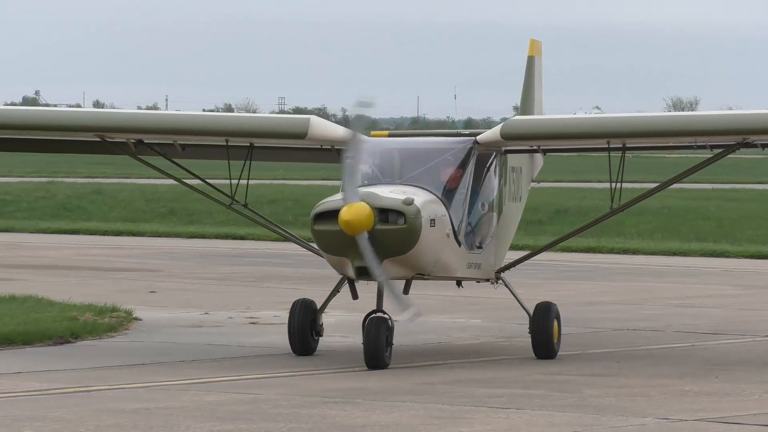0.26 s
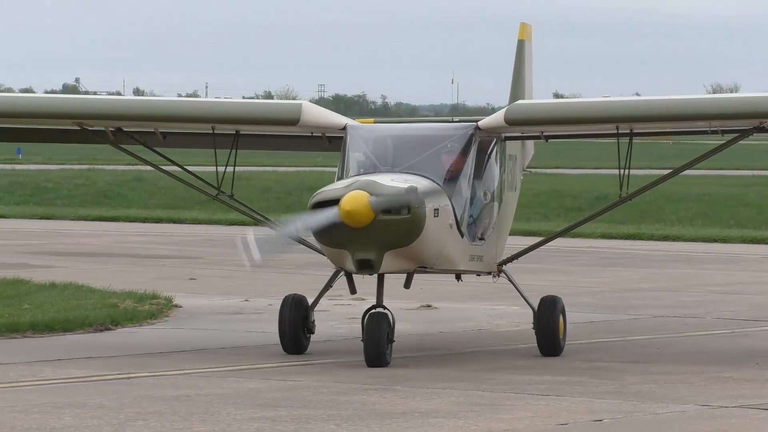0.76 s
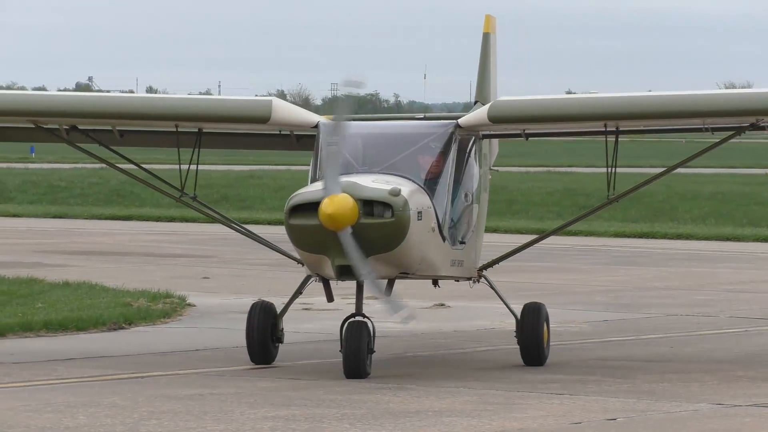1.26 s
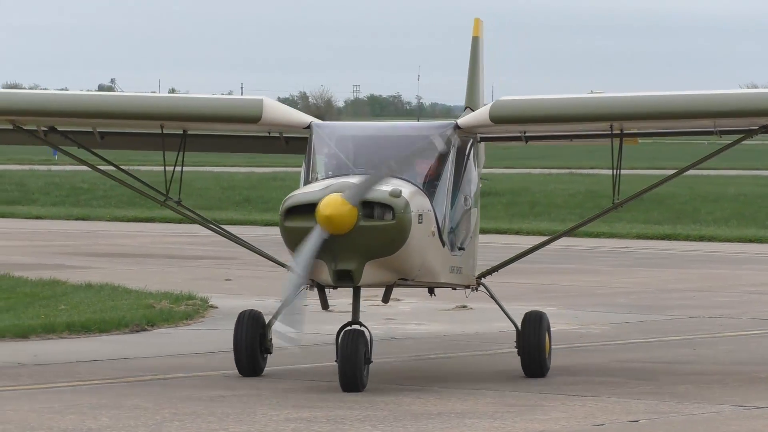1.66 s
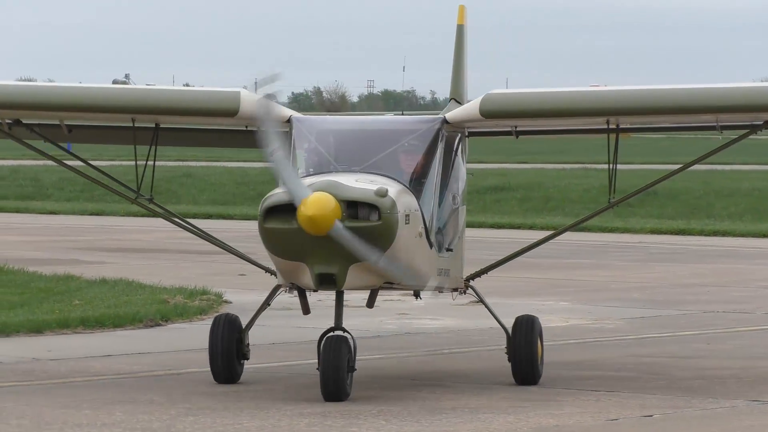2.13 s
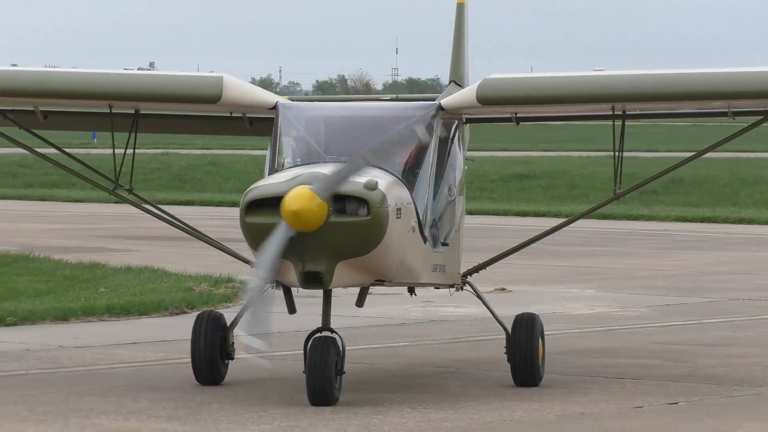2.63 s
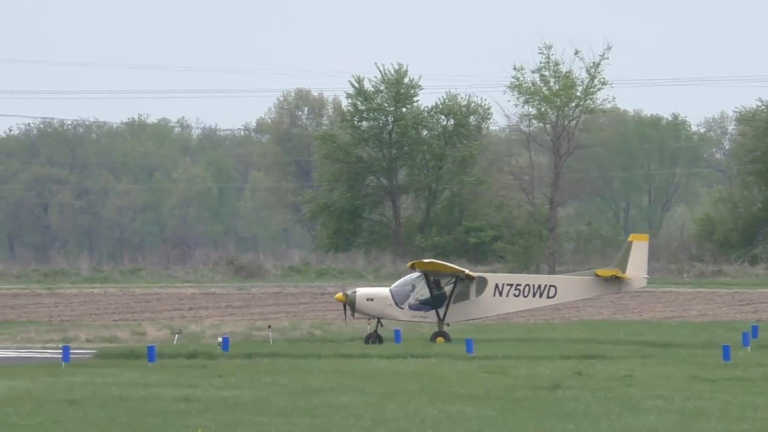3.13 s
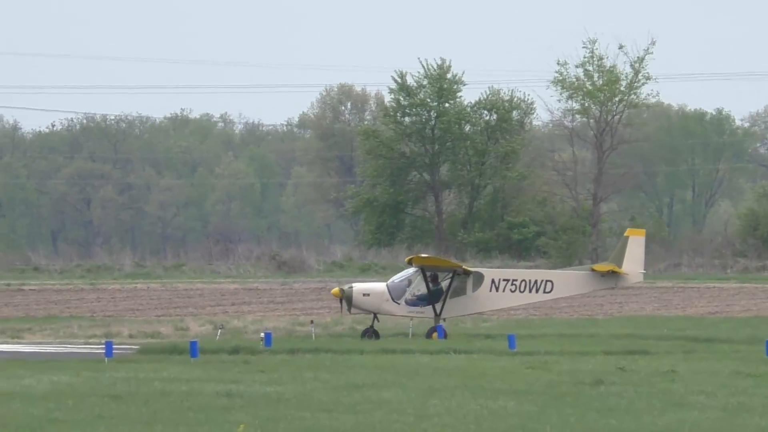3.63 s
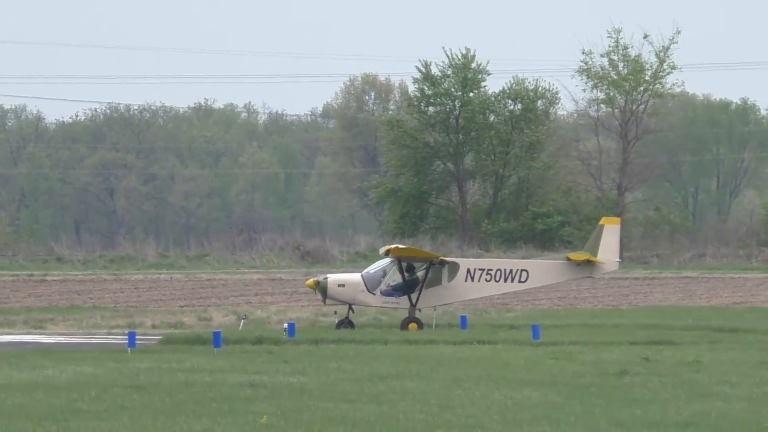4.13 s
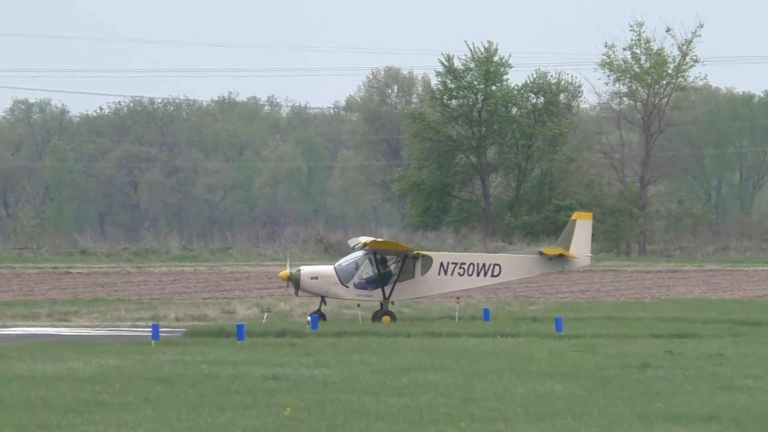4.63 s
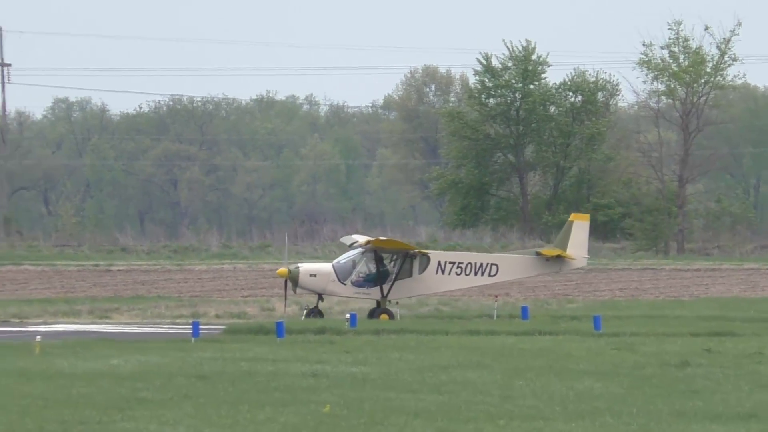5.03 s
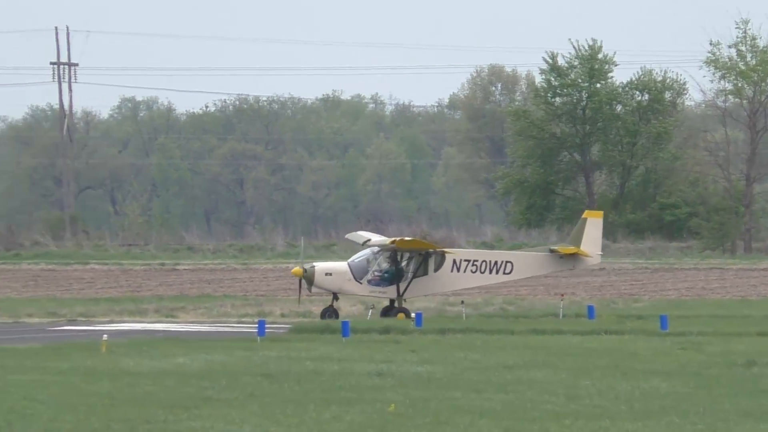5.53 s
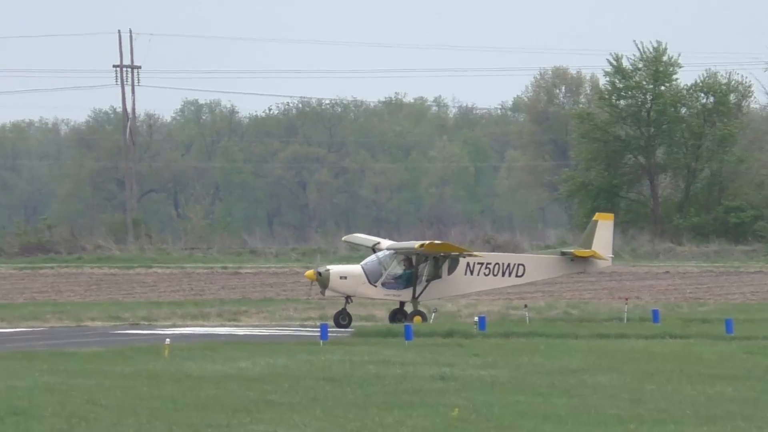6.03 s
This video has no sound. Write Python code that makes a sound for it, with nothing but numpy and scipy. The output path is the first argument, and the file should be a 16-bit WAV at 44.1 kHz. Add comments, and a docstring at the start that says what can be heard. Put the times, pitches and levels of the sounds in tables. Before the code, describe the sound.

Close, loping idle of a small taxiing propeller plane, switching abruptly to its faint faraway drone under whistling birdsong.

```python
"""A light aircraft, near and far

A four-cylinder engine idles as the aircraft taxis close by: gas pulses ring unequal pipes in a loping
beat, valves tick on steel, and the propeller chops the air in step with the firings. The scene then
jumps to the same aircraft far across the airfield, a faint mutter in the open air, while a lark
whistles in the grass and other birds answer from farther off."""
import sys
import numpy as np
from scipy import signal
from scipy.fft import rfft, irfft, next_fast_len
from scipy.io import wavfile
from scipy.ndimage import map_coordinates

SR = 44100
rng = np.random.default_rng(int(sys.argv[2]) if len(sys.argv) > 2 else 0)


def unload_wav(signal):
    """Save mono or channel-first audio to the path in sys.argv[1] as 16-bit WAV at rate SR, clipped to [-1, 1]."""
    wavfile.write(
        sys.argv[1],
        SR,
        np.round(np.clip(np.atleast_2d(signal).T, -1, 1) * 32767).astype(np.int16),
    )


N = 276948
TIME = np.arange(N) / SR
JUMP_S, TOP_HZ = 2.833, 15750  # the jump from near to far; the band limit

# Likeness of left and right, far and near. Each row: frequency in Hz, correlation.
FAR_COHERENCE = [(60, 0.77), (150, 0.82), (380, 0.76), (950, 0.76), (2380, 0.12), (5980, 0.17),
                 (15000, 0.34)]
NEAR_COHERENCE = [(60, .97), (240, 1), (480, 0.58), (950, 0.16), (1900, 0.59), (3800, 0.5), (7500, 1),
                  (15000, 0.74)]
# Spectra of the noise sources. Each row: frequency in Hz, relative spectral density in dB.
HISS_SPECTRUM = [(200, 13.5), (3000, 4), (6000, -10), (8000, -6.5), (11000, -1.5), (15500, -1.5)]
RUMBLE_SPECTRUM = [(12, -48), (20, -37), (32, -15), (54, -3), (109, -0.5), (166, -5.5), (189, -14.5),
                   (228, -4), (258, -17), (400, -17), (520, -22), (880, -120)]
RUSH_SPECTRUM = [(150, -44), (250, -0.5), (403, -33), (499, -7.5), (555, -9.5), (724, -7), (1120, -3),
                 (1220, -0.5), (1550, -8), (2300, -12), (2970, -20.5), (3670, -24.5), (5050, -43),
                 (6000, -34), (7800, -69), (13200, -120)]
WASH_SPECTRUM = [(20, -35), (50, -11), (100, -1.5), (170, -9.5), (250, -11), (500, -19.5), (900, -17),
                 (2000, -54)]
TICK_SPECTRUM = [(1500, -37), (3000, -24), (4200, 0), (5300, 1), (6700, -1.5), (8400, 7), (10500, -4.5),
                 (13000, -5), (15500, -19)]
RASP_SPECTRUM = [(290, -32), (500, -17), (594, -8), (716, 7), (888, -4.5), (1060, 4), (1250, -11.5),
                 (1430, 0.5), (1650, -18), (1770, -6), (2540, -8), (4190, -16.5), (6180, -23), (9930, -23),
                 (15500, -36.5)]
# Distant hollow tones. Each row: middle and half length in seconds, pitch in Hz, level in dB.
SWELLS = [(4.468, 0.0088, 462, -46), (4.558, 0.12, 122, -42.5)]
# Machine tones. Each row: peak time in seconds, pitch in Hz, level in dB, fall either side in dB/s.
WHINES = [(3.05, 984, -62, 23), (4.7, 980, -64, 8), (5.6, 1230, -53.5, 26)]
# Hoarse calls. Each row: middle and half length in seconds, band centre and width in Hz, level in dB.
HOARSE_CALLS = [(4.061, .0015, 6800, 3000, -59), (4.54, 0.094, 6350, 1100, -74.5),
                (5.79, .016, 4050, 250, -63), (6.256, .022, 4070, 350, -68)]
# Lark song. Each row: start and length in seconds, first and last pitch in Hz, level in dB,
# swell over the note in dB, trill from 0 to 1, left minus right in dB.
LARK_NOTES = [(3.337, 0.19, 3820, 3645, -51, 18, 0.02, 10.5), (3.552, .14, 4150, 3840, -72, 7, 0.34, -16),
              (3.66, 0.32, 2935, 2860, -45, -5.5, 0.01, 7.5), (4.071, 0.069, 5000, 4760, -51, 9, 0.1, 8),
              (4.176, 0.066, 5480, 5340, -53.5, -2, 0.06, 6), (4.241, 0.039, 4100, 3930, -51, 0, 0.06, 13),
              (4.293, 0.009, 4250, 8200, -57, -2, 0, 3), (4.313, 0.051, 4580, 4160, -49, -5, 0.45, 11),
              (4.369, .058, 3610, 3370, -44, 3.5, 0.03, 8),
              (4.441, 0.064, 3720, 3495, -46.5, 11, 0.1, 11.5), (4.513, 0.11, 3400, 3170, -49, -4, 0.35, 9),
              (5.33, 0.2, 4800, 4710, -74, 3, 0.1, 13), (5.756, .11, 3820, 3540, -63.5, 3, 0.1, 15),
              (6.007, 0.039, 4850, 4550, -66, 4, 0.4, 10), (6.075, .012, 4700, 3400, -60, 0, 0, 1),
              (6.104, 0.18, 4000, 3720, -70, -1, 0.3, 17)]
# Engine speed, far and near. Each row: time in seconds, firings per second.
FAR_SPEED = [(2.8, 29), (4.5, 26.5), (5.2, 24.8), (6.28, 23.8)]
NEAR_SPEED = [(0, 29.36), (1.05, 29.12), (1.42, 29.53), (1.85, 29.0), (2.83, 29.22)]
# The far aircraft. Each row: time in seconds, relative levels of exhaust and propeller rush in dB.
FAR_LEVELS = [(2.9, -52, -59), (3.3, -54.5, -60), (3.85, -52, -64.5), (4.03, -53.5, -61),
              (4.33, -55, -60.3), (4.54, -51.5, -59), (5.6, -51, -58), (6.28, -52.5, -57.7)]
# Cylinders in firing order. Each row: exhaust lead in seconds, thump level in dB, pipe pitch in Hz,
# swell time in seconds, then relative levels in dB of rasp, valve tick, rocker clack and exhaust crack.
CYLINDERS = [(0.0034, -17, 106.4, 0.0061, 3, 11, -26, -25), (0.0039, -16.5, 97, 0.01, 4, 9, -36, -17.5),
             (0.0057, -16.5, 97.5, 0.008, 1.5, 9.5, -30.5, -17.5),
             (0.0043, -15.5, 102.6, 0.0095, 3.5, 6, -45, -33)]
# Hard firings. Each row: time in seconds, relative levels of exhaust crack and rocker clack in dB.
KNOCKS = [(.975, -19, -25), (1.009, -22, -29), (1.622, -15, -21), (2.208, -13, -23.5), (2.587, -22, -23)]
# Steel rocker gear. Each row: mode frequency in Hz, relative level in dB, time to fall 60 dB in seconds.
ROCKER_MODES = [(3816, 14.5, 0.0084), (4300, 7, 0.033), (5130, -2.5, 0.027), (5740, 0.5, 0.036),
                (6710, -1.5, 0.062), (7280, -11, .035), (7700, -2, 0.035), (8100, -19, 0.055),
                (8660, -9, .04), (9530, -4, 0.032), (9820, -1, 0.063), (10800, 1.5, 0.054),
                (11800, -0.5, 0.033)]
# Exhaust pipe overtones. Each row: frequency in Hz, bandwidth in Hz, gain in dB.
PIPE_MODES = [(388.7, 47.4, 6.5), (703, 104, -10), (1062, 48, -8.5), (1550, 236, -11), (1787, 62, -6),
              (2500, 47, -16.5)]
# Filters on the parts of the exhaust sound. Each row: frequency in Hz, gain in dB.
THUMP_MUFFLER = [(25, -24), (45, 6), (60, 0), (115, 2), (150, 5.5), (200, 1), (300, -9), (600, -25)]
BARK_MUFFLER = [(120, -18), (260, 0), (320, 7), (390, -1), (465, 5.5), (510, -13.5), (590, -15),
                (660, 4), (810, 10.5), (880, -5), (1000, 4.5), (3000, -2), (6000, -12)]
RASP_FILTER = [(600, -7), (1500, -2.5), (2500, 2), (4000, 4), (6000, -2.5), (9000, -2)]
CRACK_FILTER = [(350, -26), (700, 7), (1100, 14), (1800, 9.5), (2800, 11.5), (4200, 13),
                (5500, -7), (12000, -8)]
# Exhaust eddies. Each row: frequency in Hz, share of the power that repeats each cycle.
REPEAT_SHARE = [(420, .5), (700, .2), (1500, .08)]
# Stereo balance of the near aircraft. Each row: frequency in Hz, left minus right in dB.
NEAR_PAN = [(200, -.5), (380, -3), (700, -5), (1290, -5.5), (2380, -3.3), (4400, -1), (8000, 0)]


def amp(db):
    """Decibels as an amplitude ratio."""
    return 10 ** (np.asarray(db) / 20)


def unit(x):
    """Normalisation to rms 1."""
    return x / np.sqrt(np.mean(x ** 2) + 1e-20)


def along(points, hz):
    """Interpolation of (Hz, value) points on a log frequency axis."""
    f, values = np.transpose(points)
    return np.interp(np.log(hz + 1), np.log(f + 1), values)


def curves(rows):
    """Linear interpolation in time of each column after the first."""
    times, *columns = np.transpose(rows)
    return [np.interp(TIME, times, column) for column in columns]


def wobble(rate):
    """A smooth random curve with rate knots a second."""
    return map_coordinates(rng.standard_normal(int(N * rate / SR) + 4), [TIME * rate])


def sine(hz):
    """A tone whose phase is the integral of its frequency."""
    return np.sin(2 * np.pi * np.cumsum(hz) / SR)


def filtered(x, response):
    """Linear filtering: the spectrum times a frequency response."""
    size = next_fast_len(N + SR // 2)
    return irfft(rfft(x, size) * response(np.fft.rfftfreq(size, 1 / SR)), size)[..., :N]


def shaped(x, gains):
    """Filtering by a (Hz, dB) curve."""
    return filtered(x, lambda hz: amp(along(gains, hz)))


def coloured(x, spectrum):
    """Spectral shaping, at rms 1."""
    return unit(shaped(x, spectrum))


def noise(coherence):
    """White stereo noise: the ratio of mid to side sets the correlation of the channels."""
    def weights(hz):
        angle = np.arccos(np.clip(along(coherence, hz), -1, 1)) / 2
        return np.array([np.cos(angle), np.sin(angle)])
    mid, side = filtered(rng.standard_normal((2, N)), weights)
    return np.array([mid + side, mid - side])


def add(track, s, sound):
    """Superposition of a sound on a track from s seconds."""
    start = round(s * SR)
    first, last = max(start, 0), min(start + sound.shape[-1], N)
    if last > first:
        track[..., first:last] += sound[..., first - start:last - start]


def firings(speed):
    """The firing rate integrates to a running count; each whole number gives a firing time."""
    count = .483 + np.cumsum(curves(speed)[0]) / SR  # starts between two firings
    return count, np.interp(np.arange(int(count[-1])), count, TIME)


def strokes(times, levels_db, scatter_db):
    """Cycle-to-cycle variation: (seconds, dB) for each firing, scattered about its cylinder's level."""
    db = np.resize(levels_db, len(times)) + scatter_db * rng.standard_normal(len(times))
    return np.column_stack([times, db])


def bursts(times, levels_db, rise_s, fall_s, scatter_db):
    """An envelope of rms 1 that flares at each firing and decays exponentially."""
    t, envelope = np.arange(SR // 10) / SR, np.zeros(N)
    shape = (1 - np.exp(-t / rise_s)) * np.exp(-t / fall_s)
    for s, db in strokes(times, levels_db, scatter_db):
        add(envelope, s, amp(db) * shape)
    return unit(envelope)


def hiss():
    """The noise floor: steady, partly coherent microphone hiss."""
    return amp(-62) * coloured(noise([(100, .27), (10000, .62)]), HISS_SPECTRUM)


def hollow_swells():
    """Low wavering tones swell and fade under Gaussian envelopes."""
    return sum(amp(db) * np.exp(-((TIME - s) / half) ** 2) * sine(hz * (1 + .0283 * wobble(40)))
               for s, half, hz, db in SWELLS)


def machine_whines():
    """Distant machine tones swell and fade, randomly modulated in level and pitch."""
    return sum(amp(db - fall * np.abs(TIME - s) + 3.9 * wobble(11)) * sine(hz + 8 * wobble(45))
               for s, hz, db, fall in WHINES)


def hoarse_calls():
    """Birds tick and rasp without a clear pitch: pulses of band-limited noise."""
    calls = np.zeros(N)
    for s, half, hz, width, db in HOARSE_CALLS:
        band = filtered(rng.standard_normal(N), lambda f: np.exp(-((f - hz) / width) ** 2))
        calls += amp(db) * np.exp(-((TIME - s) / half) ** 2) * unit(band)
    return calls


def whistle(length, start_hz, end_hz, db, swell_db, trill, pan_db):
    """A bird's note glides to its last pitch; the trill modulates both frequency and amplitude."""
    t = np.arange(int(length * SR)) / SR
    progress = t / length
    waver, flutter = (map_coordinates(rng.standard_normal(64), [t * rate]) for rate in (90, 110))
    shake = trill * np.sin(2 * np.pi * 170 * t)
    glide_hz = end_hz + (start_hz - end_hz) * (1 - progress) ** 1.8
    tone = sine(glide_hz + 170 * shake + (5 + 110 * trill) * waver)
    edges = np.sin(np.pi / 2 * np.clip(np.minimum(t, length - t) / min(.022, length / 2), 0, 1))
    level = amp(db + swell_db * (progress - .5) + (8.8 * trill - .4) * flutter)
    return amp([[pan_db / 2], [-pan_db / 2]]) * level * edges * (1 + .5 * shake) * tone


def birds(chirp_count=14):
    """A lark, mostly on the left, and farther birds; the tree line returns a faint diffuse reflection."""
    song = np.zeros((2, N))
    for s, *note in LARK_NOTES:
        add(song, s, whistle(*note))
    slot_s = (N / SR - JUMP_S) / chirp_count
    for k, (when, pitch, span, side) in enumerate(np.clip(rng.standard_normal((chirp_count, 4)), -2, 2)):
        length, hz = .062 * np.exp(span / 2), 4300 * np.exp(.19 * pitch)
        chirp = whistle(length, hz, .96 * hz, db=-71, swell_db=0, trill=.28, pan_db=-5 + 8 * side)
        add(song, JUMP_S + slot_s * (k + 1 + when / 2), chirp)
    t = np.arange(SR) / SR
    echo_shape = (1 - np.exp(-t / .15)) * amp(-60 * t)
    trees = unit(rng.standard_normal((2, SR)) * echo_shape) / np.sqrt(SR)
    return song + amp(-19.5) * signal.fftconvolve(song, trees, axes=1)[:, :N]


def far_plane():
    """A distant mutter and rush, amplitude-modulated: they waver, and dip while the lark is loudest."""
    _, times = firings(FAR_SPEED)
    exhaust_db, rush_db = curves(FAR_LEVELS)
    waver_db = 1.5 * wobble(9)
    mutter = amp(exhaust_db + .5 + waver_db) * unit(exhaust_thumps(times, scatter_db=3, jitter_s=.001))
    rumble = amp(exhaust_db + 2) * coloured(noise(FAR_COHERENCE), RUMBLE_SPECTRUM)
    pulses = bursts(times, [0], rise_s=.0023, fall_s=.036, scatter_db=1)
    chop = unit(np.hypot(pulses, 1.5))
    rush = amp(rush_db + 4 + .38 * wobble(16)) * coloured(chop * noise(FAR_COHERENCE), RUSH_SPECTRUM)
    return mutter + rumble + rush


def propeller(count, flow):
    """Two blades pass in step with the firings, giving even harmonics and a pulsing broadband wash."""
    blades = sum(amp(db) * np.sin(2 * np.pi * order * (count - .2))
                 for order, db in [(2, -31.4), (4, -29.2), (6, -44)])
    wash = amp(-32) * coloured(flow * noise([(50, .17), (400, .57)]), WASH_SPECTRUM)
    return blades + wash


def approach_db(s, db_per_s=1.8):
    """The valve gear gains level as the distance to the nose shrinks."""
    return db_per_s * (np.minimum(s, JUMP_S) - JUMP_S / 2)


def valve_ticks(times):
    """One metallic impact per firing, with a short reverberation under the cowling."""
    levels_db = [row[5] for row in CYLINDERS]
    snap = bursts(times, levels_db, rise_s=.00065, fall_s=.0031, scatter_db=2.6)
    cowling = bursts(times, levels_db, rise_s=.002, fall_s=.04, scatter_db=1.5)
    ticks = np.hypot(snap, .98 * cowling) * noise(NEAR_COHERENCE)
    return amp(-46 + approach_db(TIME)) * coloured(ticks, TICK_SPECTRUM)


def rocker_clacks(times, lead_s=.001):
    """An impact just before each firing excites the damped modes of the steel, never twice alike."""
    t, ringing, snaps = np.arange(SR // 16) / SR, np.zeros(N), np.zeros(N)
    hz, mode_db, t60 = np.transpose(ROCKER_MODES)[:, :, None]
    attack = 1 - np.exp(-t / .00017)
    regular = strokes(times[times < JUMP_S] - lead_s, [row[6] for row in CYLINDERS], scatter_db=2)
    strikes = [(s, db + approach_db(s)) for s, db in regular] + [(s, db) for s, _, db in KNOCKS]
    for s, db in strikes:
        strength, detune, phase = rng.standard_normal((3, len(ROCKER_MODES), 1))
        decay = amp(mode_db + 2 * strength - 60 * t / t60)
        modes = decay * np.sin(2 * np.pi * (hz * (1 + .0175 * detune) * t + phase))
        add(ringing, s, amp(db - 16.5) * attack * modes.sum(axis=0))
        add(snaps, s, amp(db - 13.5) * attack * np.exp(-t / .0048))
    return ringing + snaps * coloured(noise(NEAR_COHERENCE), TICK_SPECTRUM)


def through_pipe(x):
    """The exhaust pipe acts as parallel resonators of alternating sign."""
    return filtered(x, lambda f: sum(
        (-1) ** k * amp(db) * 1j * f * width / (hz * hz - f * f + 1j * f * width)
        for k, (hz, width, db) in enumerate(PIPE_MODES)))


def exhaust_rasp(flow):
    """Broadband noise, amplitude-modulated by the puffs of gas."""
    rasp = coloured(flow * noise(NEAR_COHERENCE), RASP_SPECTRUM)
    return amp(-29) * shaped(rasp, RASP_FILTER)


def exhaust_cracks(times):
    """Each firing is a transient that rings the pipe's overtones; a few knock harder."""
    t, envelope = np.arange(SR // 20) / SR, np.zeros(N)
    shape = (1 - np.exp(-t / .00066)) * np.exp(-t / .0053)
    regular = strokes(times, [row[7] for row in CYLINDERS], scatter_db=2)
    for s, db in list(regular[times < JUMP_S]) + [(s, db) for s, db, _ in KNOCKS]:
        add(envelope, s, amp(db) * shape)
    return amp(-45) * coloured(through_pipe(envelope * noise(NEAR_COHERENCE)), CRACK_FILTER)


def exhaust_bark(times, flow):
    """Turbulence drives the pipe: coarse eddies partly repeat each cycle, fine ones are mostly new."""
    t, repeats = np.arange(SR // 16) / SR, np.zeros(N)
    puffs = rng.standard_normal((len(CYLINDERS), len(t))) * np.exp(-t / .024)
    for k, (s, db) in enumerate(strokes(times, [0], scatter_db=.75)):
        add(repeats, s - .002, amp(db) * puffs[k % len(CYLINDERS)])
    coarse = filtered(unit(repeats), lambda hz: along(REPEAT_SHARE, hz) ** .5)
    fine = filtered(flow * noise(NEAR_COHERENCE), lambda hz: (1 - along(REPEAT_SHARE, hz)) ** .5)
    return amp(-31.5) * coloured(through_pipe(coarse + fine), BARK_MUFFLER)


def exhaust_thumps(times, scatter_db, jitter_s):
    """Each cylinder's gas slug excites its own pipe resonance; the unequal pipes make the idle lope."""
    t, gas = np.arange(SR // 8) / SR, np.zeros(N)
    for k, s in enumerate(times):
        lead_s, db, hz, swell_s = CYLINDERS[k % len(CYLINDERS)][:4]
        delay, strength = rng.standard_normal(2)
        ring = -t / swell_s * np.exp(1 - t / swell_s) * np.sin(2 * np.pi * hz * t)
        add(gas, s - lead_s + jitter_s * delay, amp(db + scatter_db * strength) * ring)
    return shaped(gas, THUMP_MUFFLER)


def near_plane():
    """Exhaust, valve gear and propeller are phase-locked to the crankshaft, over a faint whine."""
    count, times = firings(NEAR_SPEED)
    puffs = bursts(times, [row[4] for row in CYLINDERS], rise_s=.003, fall_s=.036, scatter_db=.8)
    flow = unit(np.hypot(puffs, .75))  # pulsing and steady parts add in power
    rasp = exhaust_rasp(flow)
    chop = propeller(count, flow)
    whine = amp(-51) * sine(563 + 1.6 * wobble(4.6))
    lope = exhaust_thumps(times, scatter_db=.6, jitter_s=.00018)
    exhaust = lope + exhaust_bark(times, flow) + rasp + exhaust_cracks(times)
    total = exhaust + chop + whine + valve_ticks(times) + rocker_clacks(times)
    return filtered(total, lambda hz: amp(np.outer([.5, -.5], along(NEAR_PAN, hz))))


def scene():
    """A 2 ms crossfade leads from the close engine to the wide, quiet field."""
    close = np.clip((JUMP_S - TIME) / .002, 0, 1)
    field = far_plane() + machine_whines() + hollow_swells() + birds() + hoarse_calls() + hiss()
    return close * near_plane() + (1 - close) * field


def record(dry):
    """An ideal low-pass filter keeps nothing above the band limit."""
    return filtered(dry, lambda hz: hz < TOP_HZ)


dry = scene()
out = record(dry)
unload_wav(out)
```